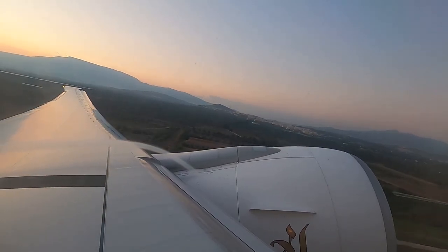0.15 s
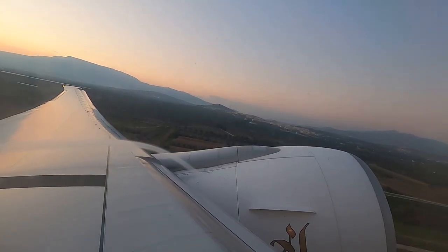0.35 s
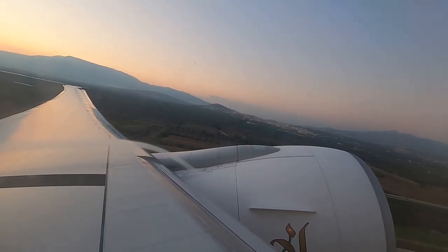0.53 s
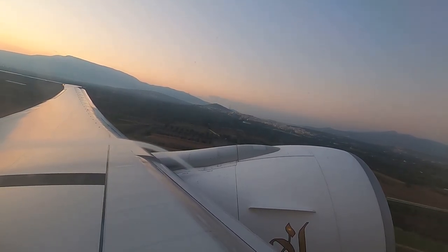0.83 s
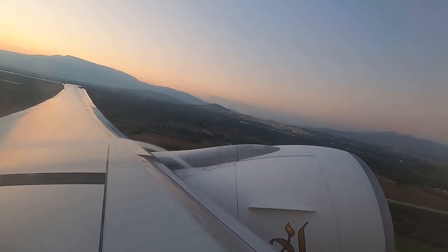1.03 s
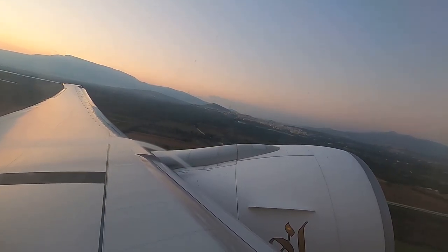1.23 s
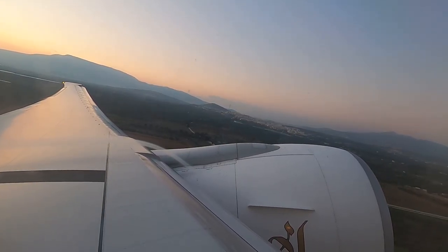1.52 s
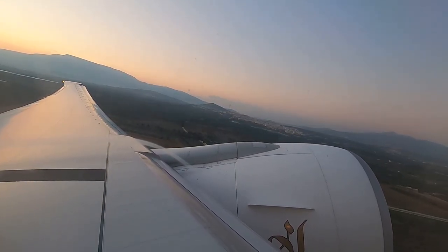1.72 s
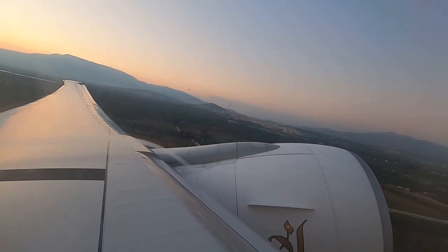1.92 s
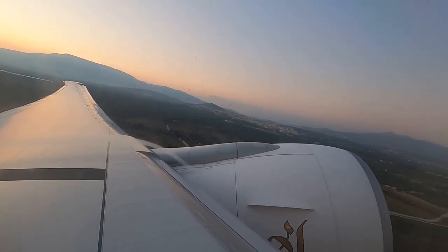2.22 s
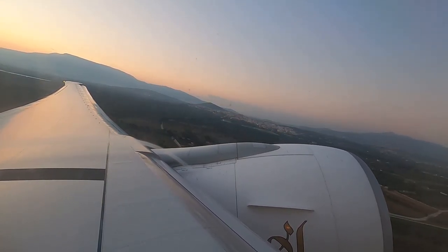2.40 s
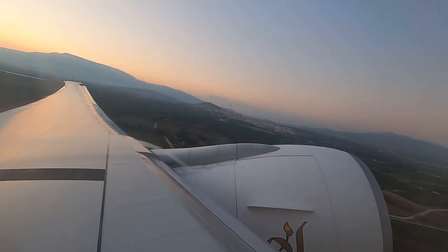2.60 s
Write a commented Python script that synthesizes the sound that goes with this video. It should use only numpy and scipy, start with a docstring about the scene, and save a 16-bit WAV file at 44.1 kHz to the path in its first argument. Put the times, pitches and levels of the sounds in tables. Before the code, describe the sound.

Jet engine roar inside an airliner cabin, deep steady rumble with soft rushing air

```python
"""Inside an airliner climbing after take-off, at a window seat beside a large turbofan.
Exhaust rumble is shaped noise coming through the wall; air rushing along the skin is brighter, wider noise.
Narrow noise bands ring in cabin and panels, a hollow boom surges, sines hum at multiples of the fan shaft's
speed and two close noise bands make a faint high whine. A limiter holds the bass peaks."""
import sys
import numpy as np
from scipy import signal
from scipy.fft import rfft, irfft
from scipy.io import wavfile
from scipy.ndimage import uniform_filter1d, minimum_filter1d, map_coordinates

SR = 44100
rng = np.random.default_rng(int(sys.argv[2]) if len(sys.argv) > 2 else 0)


def transcribe(u):
    """Save the signal u as a 16-bit wav file named by the first command-line argument.

    u: samples, shape (n,) or (channels, n), limited to [-1, 1]; the rate is SR.
    q: integer samples, one column per channel.
    """
    v = np.clip(np.atleast_2d(u).T, -1, 1)
    q = np.round(v * 32767).astype(np.int16)
    wavfile.write(sys.argv[1], SR, q)


N = 121275  # length in samples


def undb(db):
    """Decibels to gain."""
    return 10 ** (np.asarray(db) / 20)


def level(x, db):
    """Set the rms level, taken over both channels together if there are two."""
    return x * undb(db) / np.sqrt(np.mean(x ** 2))


def freqs():
    """Frequency of each spectral bin in Hz, at least 1 so that its log exists."""
    return np.maximum(np.arange(N // 2 + 1) * SR / N, 1)


def over_freq(table):
    """Each column of a table, joined by straight lines over log frequency."""
    hz, *columns = np.array(table, float).T
    return [np.interp(np.log(freqs()), np.log(hz), column) for column in columns]


def over_time(table):
    """A level curve (start_s, level_db), joined by straight lines in dB, as a gain."""
    start_s, level_db = np.array(table, float).T
    return undb(np.interp(np.arange(N) / SR, start_s, level_db))


def walk(rate_per_s):
    """Smoothed random wandering around 0 with an rms of 1."""
    step = int(SR / rate_per_s)
    held = np.repeat(rng.standard_normal(N // step + 2), step)
    # Two moving averages round off the steps.
    smooth = uniform_filter1d(uniform_filter1d(held, step), step)[:N]
    return level(smooth - smooth.mean(), 0)


def pan(left_db):
    """Gains of the two channels for a left minus right difference in dB."""
    return undb(np.array([[1], [-1]]) * left_db / 2)


def noise(gain, left_db, diffuse):
    """Stereo noise coloured by a spectrum; its diffuse share (0-1) is unrelated at the two ears."""
    mid, side = np.exp(2j * np.pi * rng.random((2, N // 2 + 1)))  # random phases
    side_power = diffuse / 2
    opposed = np.sqrt(side_power) * side * np.array([[1], [-1]])
    both = np.sqrt(1 - side_power) * mid + opposed
    return irfft(both * gain * pan(left_db), N)


def peak(hz, width_hz):
    """Gain of a narrow resonance, 9 dB down at one width to either side."""
    return 1 / (1 + ((freqs() - hz) / width_hz) ** 2) ** 1.5


def drift(x, share, rate_per_s):
    """Let the pitch wander by a small rms share, by reading the sound at a wandering speed."""
    place = np.arange(N) + np.cumsum(share * walk(rate_per_s))
    return np.array([map_coordinates(channel, [place], mode="mirror") for channel in x])


def rumble():
    """Deep exhaust roar: bass-heavy noise through the wall, almost the same at both ears."""
    # Colour of the roar: pitch_hz, relative density_db [dB per Hz]
    rumble_colour = [(12, -15.5), (17, -12), (22, -5.5), (34, 1), (45, -1), (56, 3.5), (68, -4.5),
                     (82, -1.2), (102, -2.3), (135, 3), (162, -3), (185, -0.5), (203, -8), (240, -9),
                     (290, -16), (390, -17), (480, -25), (620, -32), (1000, -48), (2000, -81)]
    # Slow swell of the roar: start_s, relative level_db
    rumble_swell = [(0, 0.9), (.55, 1.9), (.95, 1.5), (1.6, 0), (2.75, -0.7)]
    density_db, = over_freq(rumble_colour)
    roar = noise(undb(density_db), left_db=1.48, diffuse=0.0035)
    return level(roar * over_time(rumble_swell), -14)


def airflow():
    """Turbulent rush on the fuselage: broad noise, more diffuse in parts of the treble, in slight gusts."""
    # Colour and spread: pitch_hz, relative density_db [dB per Hz], left_minus_right_db, diffuse_share [0-1]
    air_colour = [(100, -5, -2, .3), (400, 4, -2.5, 0.2), (686, 0.5, 2, 0.2), (846, -7, 5.5, 0.02),
                  (1026, 0.5, 2, 0.2), (1140, -3, 2, .13), (1210, -6.5, 3, .14), (1340, -6, 4, .16),
                  (1600, -8.5, 1.5, 0.1), (1770, -10, 3, .25), (2030, -12, 3, 0.4), (2500, -14.5, 2.5, 0.3),
                  (2940, -18, 6, 0.4), (3900, -18, 5, 0), (4500, -21.5, 4, 0.5), (5600, -26, 4.5, 0.7),
                  (6600, -29, 5, .45), (7100, -27.5, 0, 0.3), (7920, -31.5, 7.5, .45), (8540, -43, 1, .6),
                  (9400, -39.5, 2.5, .65), (10600, -51.5, -4.5, .6), (12700, -46.5, -2.5, .5),
                  (13500, -68.5, 7, .5)]
    # Gusts of the rushing air: start_s, relative level_db
    air_gusts = [(0, 0.3), (.4, 1), (.52, -0.5), (.75, 2.5), (1.13, 1), (1.35, 0), (1.53, 1.1), (1.7, -0.3),
                 (2.1, 0.9), (2.3, 0.8), (2.45, -0.2)]
    flutter_db, flutter_per_s = 0.95, 36  # quick unevenness: rms depth, changes a second
    density_db, left_db, diffuse = over_freq(air_colour)
    gusts = over_time(air_gusts) * undb(flutter_db * walk(flutter_per_s))
    return level(noise(undb(density_db), left_db, diffuse) * gusts, -36.5)


def resonances():
    """Cabin and panel resonances and machinery whine: narrow noise bands, each wavering by itself."""
    # Bands: pitch_hz, width_hz, level_db [rms], left_minus_right_db, diffuse_share [0-1]
    bands = [(57, 4.3, -28.5, 2.5, 0.02), (533.6, 13, -48, 0.5, 0), (807, 38, -48.5, -2, 1),
             (913, 37, -50, 2.5, 0), (1023, 43, -57, 0, 0.2), (1553, 45, -63.5, 3.5, 0.4),
             (1690, 25, -61.5, 3.5, 0.3), (2078, 21, -64, -2, .4), (2117, 20, -62.5, -2, .4),
             (2258, 28, -65, 9, 0.6), (2597, 27, -63.5, 5.5, .4), (3276, 50, -65, 6.5, 0.3),
             (3400, 60, -69, 5, .4), (3670, 83, -69, 7.5, .7), (4320, 44, -73.5, 3.5, .4),
             (6110, 170, -66, 4.5, 0.3)]
    waver_db, waver_per_s = 0.55, 16  # rms depth, changes a second
    out = 0
    for hz, width_hz, level_db, left_db, diffuse in bands:
        ringing = noise(peak(hz, width_hz), left_db, diffuse)
        waver = undb(waver_db * walk(waver_per_s))
        out = out + level(ringing * waver, level_db)
    return out


def boom():
    """The engine roar rings a hollow cabin resonance: a noise band that swells and sinks."""
    # Surges of the boom: start_s, level_db [rms]
    boom_surges = [(0, -30.5), (.28, -29), (.5, -32.5), (.68, -26), (.84, -29.5), (.98, -25), (1.26, -38),
                   (1.58, -33.5), (1.69, -27.5), (2, -29), (2.23, -35), (2.62, -29), (2.75, -32)]
    hollow = noise(peak(hz=323, width_hz=24.7), left_db=-1.4, diffuse=0.02)
    return level(hollow, 0) * over_time(boom_surges)


def fan_hum():
    """Sines locked to whole multiples of the fan shaft's speed, so they wander in pitch together."""
    # Hum tones: multiple [of shaft speed], left_minus_right_db
    orders = [(3, 0.5), (5, -1), (8, 5)]
    # The 3rd and 5th trade the lead: start_s, third_level_db, fifth_level_db, eighth_level_db [rms]
    hum_curves = [(0, -32, -33, -48), (.2, -30, -34, -42.5), (.36, -26, -22.5, -47),
                  (.9, -25.5, -25, -46.5), (1.17, -22, -33.5, -54.5), (1.38, -19, -30.5, -39.5),
                  (1.6, -32, -25, -42), (1.8, -19, -31, -43), (2.15, -22.5, -27.5, -43),
                  (2.4, -21.5, -35.5, -41), (2.75, -33, -15.5, -44)]
    shaft_hz, wander_share, wander_per_s = 37.6, 0.0011, 2.044
    waver_db, waver_per_s = 2, 4.5  # rms depth, changes a second
    speed_hz = shaft_hz * (1 + wander_share * walk(wander_per_s))
    turns = np.cumsum(speed_hz) / SR
    start_s, *curves_db = np.array(hum_curves, float).T
    out = 0
    for (multiple, left_db), level_db in zip(orders, curves_db):
        tone = np.sin(2 * np.pi * (multiple * turns + rng.random()))
        wavering = level(tone * undb(waver_db * walk(waver_per_s)), 0)
        out = out + wavering * over_time(np.c_[start_s, level_db]) * pan(left_db)
    return out


def whine():
    """Thin, rough turbine whine: two close noise bands that drift in pitch and come and go."""
    # Bands of the whine: pitch_hz, width_hz, relative level_db
    whine_bands = [(4040, 65, -2), (4100, 48, -3)]
    # Its rise and fall, loudest at the end: start_s, level_db [rms]
    whine_curve = [(0, -60), (.42, -58), (.6, -68), (.92, -58), (1.35, -63.5), (1.8, -58), (1.94, -61),
                   (2.06, -56), (2.18, -61.5), (2.44, -60), (2.52, -57), (2.75, -54.5)]
    colour = sum(undb(level_db) * peak(hz, width_hz) for hz, width_hz, level_db in whine_bands)
    steady = noise(colour, left_db=2.5, diffuse=0.06)
    drifting = drift(steady, share=0.004, rate_per_s=13)
    return level(drifting, 0) * over_time(whine_curve)


def scene():
    """All the cabin's layers together; the sound arrives slightly later on the left."""
    left_lag_s = 0.00003
    left, right = rumble() + airflow() + resonances() + boom() + fan_hum() + whine()
    # A phase turn that grows with frequency is a delay.
    lag = np.exp(-2j * np.pi * freqs() * left_lag_s)
    return np.array([irfft(rfft(left) * lag, N), right])


def record(dry):
    """A look-ahead limiter eases down the peaks of the bass, then a steep low-pass cuts the top."""
    bass_split_hz, top_hz = 640, 13480
    limit_db, hold_s = -7, 0.015
    # Filtering both ways keeps the bass in phase, so it can be subtracted.
    bass = signal.sosfiltfilt(signal.butter(2, bass_split_hz, fs=SR, output="sos"), dry)
    limit = undb(limit_db)
    loudest = np.abs(bass).max(axis=0)  # one gain for both channels
    needed = limit / np.maximum(loudest, limit)
    hold = int(hold_s * SR)
    # The centred window starts turning down before the peak.
    gain = uniform_filter1d(minimum_filter1d(needed, hold), hold)
    limited = dry - bass + bass * gain
    # 0.2 dB of ripple below the edge, 70 dB down beyond it
    return signal.sosfilt(signal.ellip(8, 0.2, 70, top_hz, fs=SR, output="sos"), limited)


dry = scene()
out = record(dry)
transcribe(out)
```